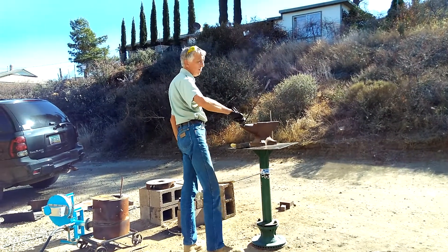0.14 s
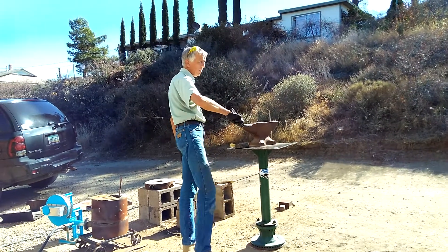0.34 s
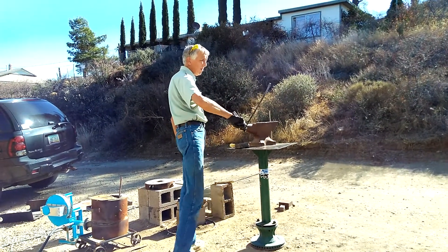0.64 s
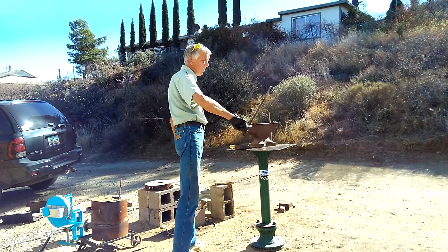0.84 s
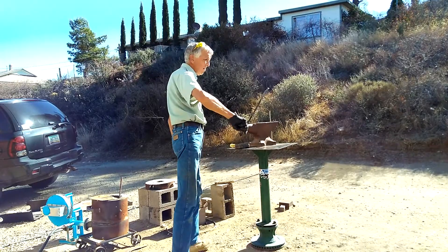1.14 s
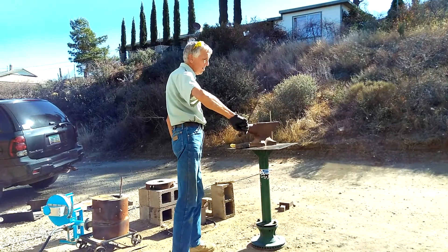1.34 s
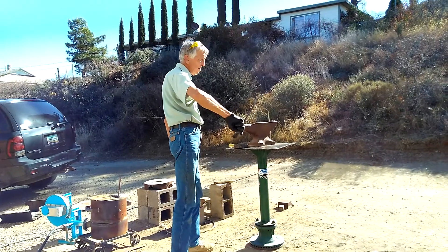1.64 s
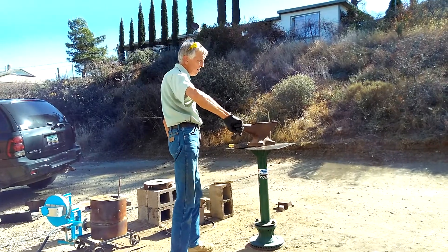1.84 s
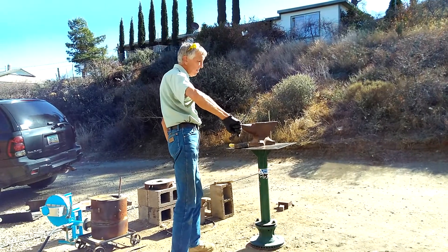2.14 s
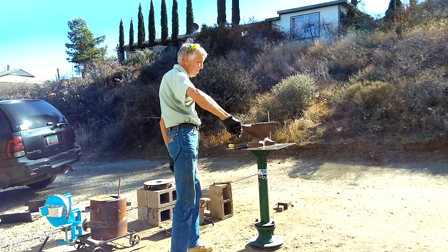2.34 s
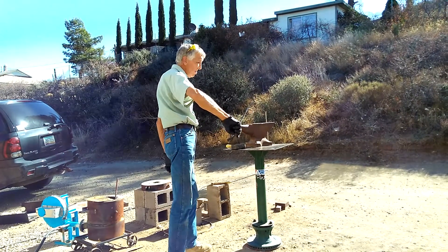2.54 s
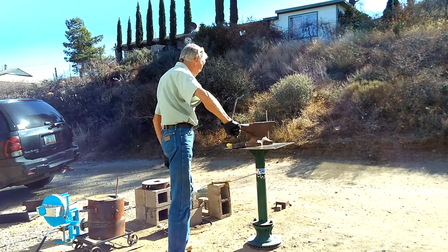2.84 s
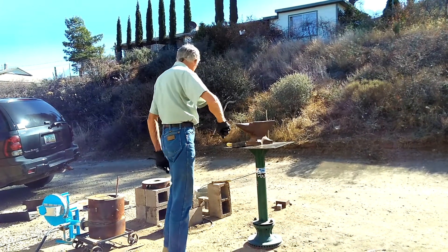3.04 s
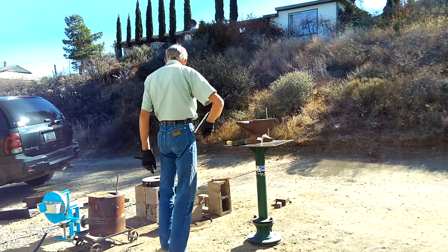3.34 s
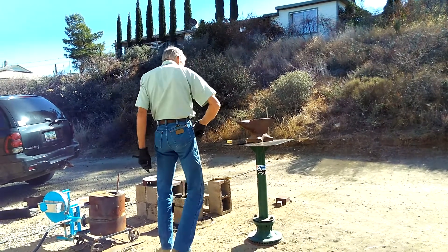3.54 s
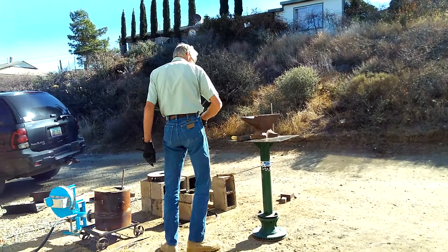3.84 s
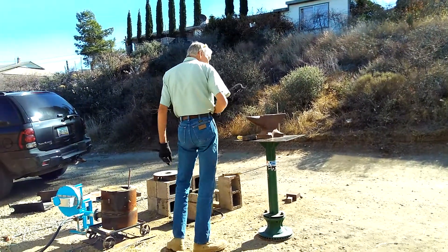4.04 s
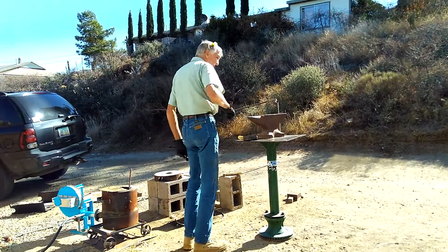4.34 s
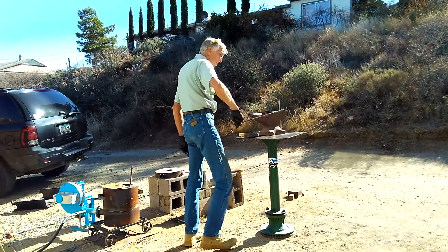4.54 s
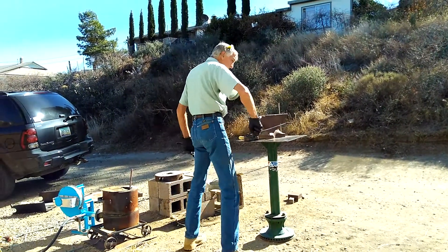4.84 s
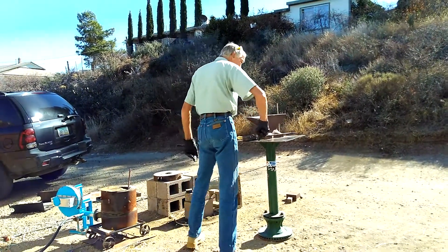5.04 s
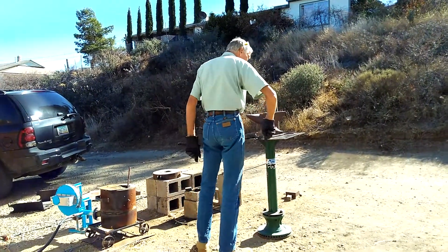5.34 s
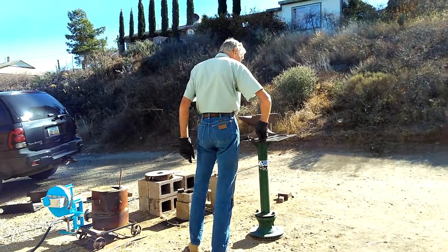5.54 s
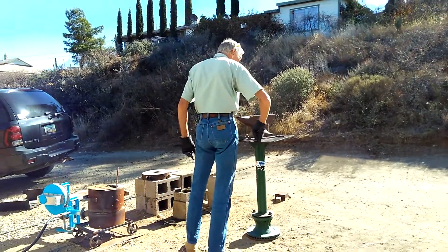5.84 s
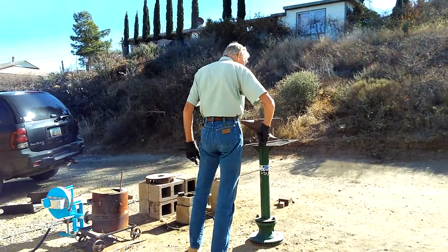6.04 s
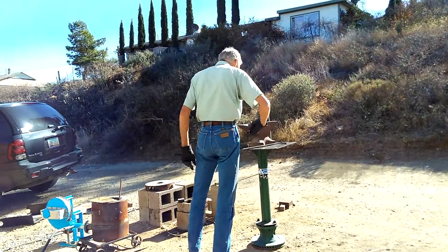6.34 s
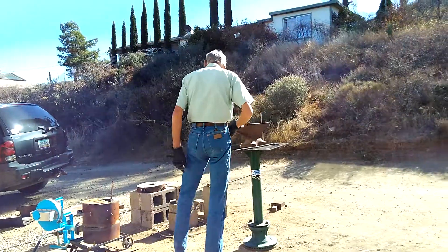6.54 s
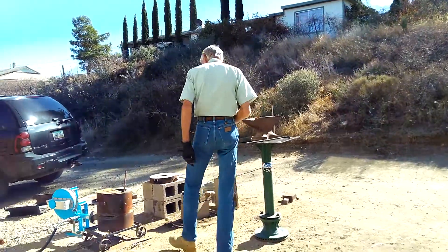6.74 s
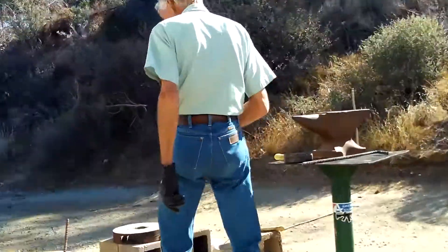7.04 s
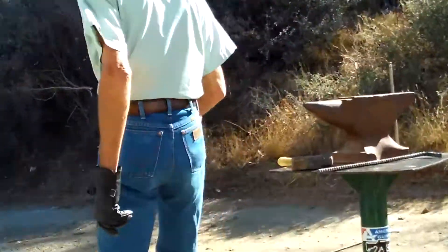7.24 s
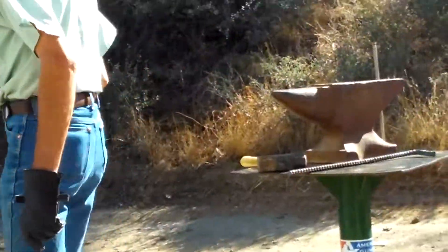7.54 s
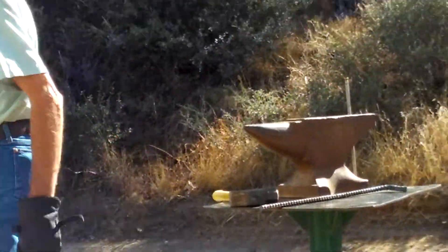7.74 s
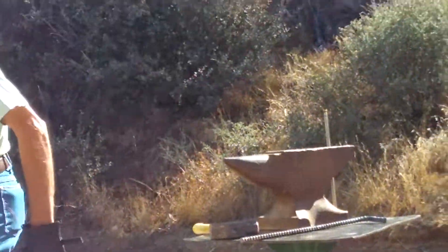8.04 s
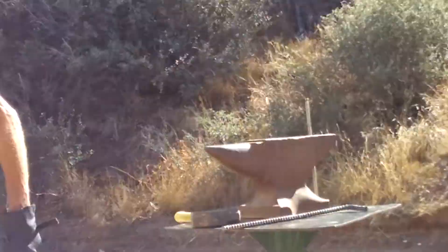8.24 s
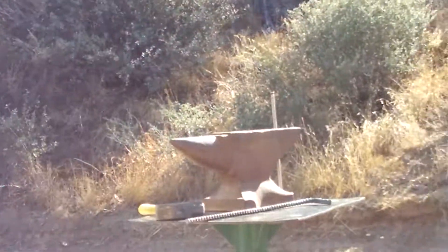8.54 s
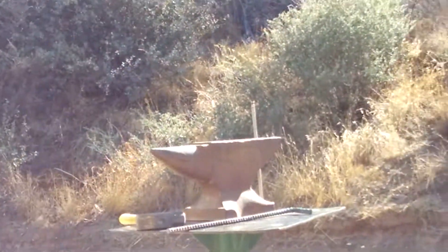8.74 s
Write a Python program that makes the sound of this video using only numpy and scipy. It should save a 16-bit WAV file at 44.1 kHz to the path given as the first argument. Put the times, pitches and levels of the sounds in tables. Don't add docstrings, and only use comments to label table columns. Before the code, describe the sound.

Low steady blower roar outdoors; around five and a half seconds metal tools drop on a ringing anvil plate, then clicks, bumps and gravel crunch.

```python
import sys
import numpy as np
from scipy import signal
from scipy.fft import rfft, irfft
from scipy.io import wavfile
from scipy.ndimage import uniform_filter1d

SR = 44100
rng = np.random.default_rng(int(sys.argv[2]) if len(sys.argv) > 2 else 0)


def level_to_linear(level):
    exponent = np.asarray(level, float) / 20
    return 10 ** exponent


def log_audio(samples):
    frames = np.atleast_2d(samples).T
    limited = np.clip(frames, -1, 1)
    pcm = np.round(limited * 32767).astype(np.int16)
    wavfile.write(sys.argv[1], SR, pcm)


N = 391608


def evened(x):
    return x / np.sqrt(np.mean(x ** 2) + 1e-20)


def read(points, hz):
    f, value = np.transpose(points)
    return np.interp(np.log(hz + 1), np.log(f + 1), value)


def follow(rows):
    rows = np.array(rows)
    return np.interp(np.arange(N) / SR, rows[:, 0], rows[:, 1])


def add(mix, s, sound):
    part = mix[:, round(s * SR):][:, :sound.shape[1]]
    part += sound[:, :part.shape[1]]


def at_ports(pair, db, alike, lag_s):
    hz = np.fft.rfftfreq(pair.shape[1], 1 / SR)
    left, other = rfft(pair) * level_to_linear(db(hz))
    c = np.clip(alike(hz), 0, 1)
    right = c * left * np.exp(-2j * np.pi * hz * lag_s) + np.sqrt(1 - c ** 2) * other
    return evened(irfft(np.array([left, right]), pair.shape[1]))


def patchy(size, patchy_db, shared_db):
    hz, t, z = signal.stft(rng.standard_normal((2, N)), nperseg=size)
    patches = uniform_filter1d(rng.standard_normal(z.shape[1:]), 8, 0)
    patches = uniform_filter1d(patches, 8, 1)
    flicker = uniform_filter1d(rng.standard_normal(len(t)), 3)
    gain = level_to_linear(patchy_db * evened(patches) + shared_db * evened(flicker))
    return signal.istft(z * gain, nperseg=size)[1][:, :N]


# f/Hz, level/dB per Hz
ROAR = [(30, -43), (60, -8.5), (110, 0.5), (250, -2), (420, -9), (560, -19.5), (750, -20.5), (1000, -28.5),
        (1700, -29), (2150, -28.5), (2420, -36), (2900, -49.5), (4500, -51), (7000, -59.5)]
# f/Hz, width/Hz, level above the roar/dB
DUCT = [(129.6, 8, 3.9), (173.1, 4.7, 9.3), (247, 57, 0.82), (318, 117, 5), (375.9, 4.1, 12.4),
        (454.9, 8.7, 13.4), (525.4, 32, 7.9), (840, 12, 6.7), (923.5, 42, 8.4), (1157, 16, 9.7),
        (1324, 39, 5.9), (1488, 118, 10.16), (1692, 97, 11.2), (2048, 20, 7)]
# f/Hz, share
ROAR_ALIKE = [(60, 0.99), (300, 0.97), (700, 0.54), (1500, 1), (2300, 0.54), (3500, 0.13), (6000, 0.089)]
# f/Hz, lag/s
ROAR_LAG = [(100, 0.00016), (500, 0.000009), (1100, 0.00015), (1600, 2.1e-4), (6000, 0.00012)]
# t/s, level/dB
DRAUGHT = [(0.0, -20), (8.88, -19)]


def blower():
    def colour(hz):
        return read(ROAR, hz) + sum(db / (1 + (2 * (hz - f) / w) ** 2) for f, w, db in DUCT)
    air = patchy(size=1024, patchy_db=1.05, shared_db=0.77)
    lag_s = read(ROAR_LAG, np.fft.rfftfreq(N, 1 / SR))
    steady = at_ports(air, colour, lambda hz: read(ROAR_ALIKE, hz), lag_s)
    speed = 1 + .011 * np.interp(np.arange(N), np.linspace(0, N, 30), rng.standard_normal(30))
    place = np.cumsum(speed) * (N - 1) / speed.sum()
    wandering = np.array([np.interp(place, np.arange(N), port) for port in steady])
    return level_to_linear(follow(DRAUGHT)) * wandering


# t/s, level/dB, highest well-driven f/Hz, chatter/s
CLANGS = [
    (5.347, -4.5, 5240, 0.025),
    (5.6504, -18.5, 4300, 0.025),
    (5.8016, -20, 5200, 0.018),
    (5.876, -25.5, 1840, 0.022),
    (5.936, -18.5, 7500, 0.011),
    (5.947, -1.5, 7850, .03),
]
STRUCK = [0, 4, 3, 1, 0, 2]
PLATE = [857, 993, 1096, 1190, 1311, 1494, 1548, 1662, 1724, 1805, 1975, 2046, 2108, 2188, 2498, 2652, 2767,
         2850, 2951, 3070, 3150, 3373, 3403, 3482, 3622, 3708, 4033, 4258, 4332, 4725]
# one row a spot, level/dB
SPOTS = [
    [-20, 0, -11, -15, -9, -8, -16, -15, -2, -11, 5, -9, -11, -1, -11, 0, -4, -4, -18, -5, -10, -11, -22,
     -28, -22, -18, -17, -8, -13, -9],
    [-12, -18, -16, -5, -16, -4, -22, -16, -14, -24, -8, -10, -12, -21, -20, -15, -15, -18, -17, -24, -18,
     -22, -22, -20, -23, -23, -23, -15, -17, -24],
    [-5, -5, -1.5, -1, 0, -8, -3, -9, -3, 2, 0, -0.5, -4, -9, -7, -1, 0, -5, -1, -9, -20, 0, -8, -15, -8,
     -15, -2, -11, -18, -5],
    [-8, -18, -17, 0, -3, -7, -20, -12, -18, -16, -0.5, -17, -13, -16, -18, -18, -14, -13.5, -12, -12, -19,
     -14, -18, -21, -21, -25, -13, -9, -7, -18],
    [-2, -5, -5, -10, -10, -8, 0, -16, -6, -8, -12, -5, -1, -6, -10, -4, 6, -2, -14, -10, -10, -16, -2, -12,
     -5, -16, -14, -12, -3, -16],
]
MODES_DB = [-3.5, 1.5, -2.5, .5, -3]
# f/Hz, level/dB per Hz
SHEET = [(290, -48), (500, -35), (714, -6), (766, -8), (871, -11.5), (935, -10.5), (1170, -0.5), (1630, -4),
         (2020, -1.5), (2500, -1), (3460, -4.5), (4940, -13.5), (6030, -18.5), (15000, -33)]
# f/Hz, t60/s
SHEET_RING = [(600, 0.81), (1200, 0.57), (2500, 0.72), (5000, 0.62), (8000, 0.63), (12000, 0.067)]
DAMPING = [0.67, 0.63, 0.63, 0.62, 0.59]
SPOT_HZ = [700, 1000, 1400, 1900, 2400, 3000, 3600, 4300, 5000]
# one row a spot, level/dB
SPOT_COLOUR = [
    [0.5, 7, 0, 1, -4, 1, 0.11, 4.5, 3],
    [-2, -5, 2, -2, 7, 4, 0, 3, 1],
    [5.5, 0, 2, 0.71, -2, -1, 1, -0.5, 2.5],
    [-5, -6, -1, 1, -2, -1, -1, 3, 2.5],
    [13, 1, 0.7, 0, 4, -5, 0, 0, -3],
]
THUD_DB = [20.6, 12, 20, 8, 13]
CRACK_DB = [-18, -24, -19, -22, -30]
LOWEST_HZ = [500, 795, 448, 800, 420]
# share of the chatter time, level/dB
BOUNCES = [
    [(0, -2), (.12, 0), (.26, -3.5), (.46, -2.5), (.68, -4.5), (.98, -8)],
    [(0, -5), (.37, 2), (.6, -10), (.98, -11)],
    [(0, -6), (.06, -7), (.27, -6), (.39, 0), (.75, -3), (.98, -3)],
    [(0, 0), (.45, -15), (.98, -12)],
    [(0, -6), (.15, -3), (.42, -2), (.98, -7)],
]
# f/Hz, share
CLANG_ALIKE = [(1000, 0.71), (3500, 0.27), (5500, 0.16), (9000, 0.25)]
# f/Hz, lag/s
CLANG_LAG = [(2500, 6e-5), (4000, 1e-5), (9000, 1e-5)]


def clang(overtones, db, top_hz, chatter_s, spot):
    size = SR // 2
    t, hz = np.arange(size) / SR, np.array(PLATE)[:, None]
    damping = DAMPING[spot]
    bounces = np.zeros(4000)
    share, bounce_db = np.transpose(BOUNCES[spot])
    bounces[(chatter_s * SR * np.clip(share, 0, 1)).astype(int)] = level_to_linear(bounce_db)

    mode_db = np.array(SPOTS[spot])[:, None] - 60 * t / (1.15 * damping * read(SHEET_RING, hz))
    shiver_db, shiver_s = 4.5, .018
    knots = np.arange(0, size / SR + shiver_s, shiver_s)[:, None]
    between = np.maximum(1 - abs(t - knots) / shiver_s, 0)
    mode_db = mode_db + shiver_db * rng.standard_normal((len(hz), len(knots))) @ between
    phase, twin_phase, apart = rng.random((3, 2, len(hz), 1))
    twin_hz = hz + 20 * (2 * apart - 1)
    twins = .6 * np.sin(2 * np.pi * (twin_hz * t + twin_phase))
    modes = (level_to_linear(mode_db) * (np.sin(2 * np.pi * (hz * t + phase)) + twins)).sum(1)

    turns = np.exp(2j * np.pi * rng.random((2, len(overtones))))
    lines = irfft(overtones * turns * rng.uniform(0.45, 1, len(overtones)), size)
    grainy = evened(lines) + 1.5 * rng.standard_normal((2, size))
    f, frames, z = signal.stft(grainy, SR, nperseg=256)
    colour_db = read(SHEET, f) + read(np.transpose([SPOT_HZ, SPOT_COLOUR[spot]]), f)
    fade_db = 60 * frames / (read(SHEET_RING, f)[:, None] * damping)
    z = z * level_to_linear(colour_db[:, None] - fade_db)
    dense = signal.istft(z, SR, nperseg=256)[1][:, :size]

    thud = np.sin(2 * np.pi * 1180 * t) * level_to_linear(THUD_DB[spot] - 60 * t / 0.013)
    ring = (evened(dense) + thud) * (1 - np.exp(-t / 0.00092))
    ring = evened(signal.oaconvolve(ring, bounces[None], axes=1)[:, :size])
    modes = modes * (1 - np.exp(-t / (0.17 * chatter_s)))
    ring = ring + level_to_linear(MODES_DB[spot]) * evened(modes)

    def contact(f):
        return -10 * np.log10(1 + (f / top_hz) ** 8 + (LOWEST_HZ[spot] / (f + 1)) ** 4)
    lag_s = read(CLANG_LAG, np.fft.rfftfreq(size, 1 / SR))
    ring = at_ports(ring, contact, lambda f: read(CLANG_ALIKE, f), lag_s)
    crack = uniform_filter1d(rng.standard_normal((2, size)), size=3)
    crack = crack * level_to_linear(CRACK_DB[spot] - 60 * t / 0.16)
    return level_to_linear(db - 5.5) * (ring / np.sqrt(np.mean(ring[:, :900] ** 2)) + crack)


# t/s, level/dB, t60/s, left over right/dB
CLICKS = [(5.5568, -26.5, .034, -1.5), (7.5118, -42, .069, -9), (7.8665, -42, .05, -5),
          (8.7036, -36, .05, -1.5), (7.866, -31, .04, 1.5), (8.6063, -28, .06, -3), (5.6605, -16, .025, -2),
          (4.311, -30, .15, -3), (6.5905, -22, .04, -3), (6.597, -38, .1, -3), (5.8015, -21, .015, 0),
          (7.867, -26, .04, 0), (4.3134, -37, .12, -8), (4.352, -42, .1, -5), (4.392, -44, .1, -5),
          (8.606, -35, .03, -3), (7.866, -42, .04, -5)]
CLICK_KIND = [0, 0, 0, 0, 1, 3, 2, 2, 2, 3, 1, 2, 3, 3, 3, 4, 5]
# centre f/Hz, width/octaves
CLICK_KINDS = [
    (9000, .95),
    (2100, .4),
    (1200, .6),
    (3480, .2),
    (6500, .4),
    (11500, .2),
]


def click(db, t60, lean_db, kind):
    t, (hz, octaves) = np.arange(8192) / SR, CLICK_KINDS[kind]

    def band(f):
        return -6 * (np.log2((f + 20) / hz) / octaves) ** 2
    noise = at_ports(rng.standard_normal((2, len(t))), band, lambda f: .7, 1e-4)
    shape = level_to_linear(-60 * t / max(t60, .004)) + 0.37 * np.exp(-t / 0.00069)
    shape *= 1 - np.exp(-t * hz / 3.2)
    return noise * shape * level_to_linear(db - 1.5 + np.array([[lean_db], [-lean_db]]) / 2)


# t/s, level/dB, ring f/Hz
STONES = [(8.5688, -31, 2000), (8.6063, -26, 3120), (8.6125, -29, 3980), (8.633, -21, 1620),
          (8.651, -26, 3250), (8.6661, -22, 3280), (8.6731, -20, 3950), (8.681, -19, 1800),
          (8.69, -22, 1500), (8.707, -27, 3520), (8.7479, -27, 1900), (8.7599, -31, 3720),
          (8.7748, -27, 3390), (8.784, -25, 3050), (8.8346, -29, 1730)]
# t/s, level/dB, ring f/Hz
TAPS = [
    (5.6543, -17, 1100),
    (5.6603, -9, 1400),
    (5.8022, -14, 1960),
    (5.8025, -17, 4300),
]


def stone(db, hz):
    t = np.arange(8192) / SR
    ring = np.sin(2 * np.pi * hz * t) * level_to_linear(db - 7.5 - 60 * t / .03 + np.array([[-4.0], [3.0]]))
    return click(db + 0.5, .02, -12.0, kind=1) + ring


# start t/s, dig-in/s, lift/s, level/dB
SCUFF = [(8.6, 0.082, 0.12, -25.5)]
# f/Hz, level/dB
SCUFF_COLOUR = [(350, -21), (600, -1), (936, -9), (1150, -5), (1790, -9), (2600, -5.5), (3850, -15),
                (4770, -23), (8520, -39), (15000, -44)]


def scuff():
    knocking = (rng.random(N) < 250 / SR) * level_to_linear(9.0 + 3.0 * rng.exponential(1, N))
    stones = rng.standard_normal((2, N)) * (1 + knocking)
    crunch = at_ports(stones, lambda hz: read(SCUFF_COLOUR, hz), lambda hz: .5, 0.00017)
    rise_db, sag_db, stop_s = 24, 14.5, 0.051
    curve = []
    for s, dig, lift, db in SCUFF:
        end = s + dig + lift
        curve += [(s - .02, -90), (s, db - rise_db), (s + dig, db), (end, db - sag_db), (end + stop_s, -90)]
    return crunch * level_to_linear(follow(curve) + 1.5)


# t/s, level/dB, f/Hz
KNOCKS = [
    (7.6524, -5, 290),
    (7.8685, -17, 480),
    (6.5902, -13, -620),
]


def knock(db, hz):
    t = np.arange(600) / SR
    return level_to_linear(db) * np.sin(2 * np.pi * hz * t) * np.exp(-(t * hz / 0.8) ** 2) * np.ones((2, 1))


# t/s, level/dB, ring f/Hz
BUTTON = (6.5897, -26, 4100)


def button(db, hz):
    t = np.arange(800) / SR
    pitch_hz = hz * (1 + 0.52 * np.exp(-t / 0.0011))
    ring = np.sin(2 * np.pi * np.cumsum(pitch_hz) / SR) * level_to_linear(-60 * t / 0.028)
    spike = np.exp(-t / 0.0005) * (0.78 * rng.standard_normal(len(t)) + 5.5 * np.sin(2 * np.pi * 1500 * t))
    return level_to_linear(db + np.array([[-6.0], [1.5]])) * (ring + spike)


# t/s, level/dB
TICKS = [(0.03, -55), (0.06, -51), (0.16, -49), (0.23, -50), (0.37, -57), (0.47, -51), (0.54, -51),
         (0.81, -56), (0.95, -52), (1.05, -57), (1.29, -47), (1.36, -48), (1.53, -58), (1.7, -50),
         (1.97, -58), (2.04, -55), (2.21, -54), (2.34, -62), (2.51, -52), (2.75, -59), (2.89, -49),
         (3.02, -49), (3.13, -55), (3.19, -55), (3.3, -47), (3.4, -49), (3.5, -56), (3.77, -50),
         (3.91, -57), (4.11, -50), (4.15, -49), (4.25, -56), (4.32, -51), (4.52, -50), (4.69, -61),
         (4.86, -57), (5.0, -58), (5.13, -63), (5.17, -62), (5.24, -53), (5.3, -49), (6.63, -50),
         (6.7, -53), (6.8, -47), (6.94, -46), (7.14, -51), (7.24, -43), (7.48, -45), (7.65, -41),
         (7.72, -46), (7.79, -47), (7.86, -50), (8.1, -45), (8.27, -51), (8.4, -43), (8.84, -42)]


def drive():
    ticks_per_s, first_tick_s = 29.38, .0264
    beats = np.arange(int(N / SR * ticks_per_s) + 1)
    at = np.round((first_tick_s + beats / ticks_per_s) * SR).astype(int)
    train = np.zeros(N)
    train[at[at < N]] = level_to_linear(1.6 * rng.standard_normal(len(at)))[at < N]
    t = np.arange(1600) / SR
    late = t - np.array([[2.5e-5], [0]])
    tick = np.sin(2 * np.pi * 3320 * late) * np.exp(-((late - .0022) / 0.00115) ** 2)
    grain = np.sin(2 * np.pi * 3500 * late) * np.exp(-((late - .0022) / 0.0006) ** 2)
    rattle = level_to_linear(-40) * signal.oaconvolve(train, level_to_linear(-60 * t / 0.043))[:N]
    shaking = (rattle + level_to_linear(-37.5)) * rng.standard_normal(N)
    ticks = signal.oaconvolve(train[None], tick, axes=1)[:, :N]
    ticks = ticks + signal.oaconvolve(shaking[None], grain, axes=1)[:, :N]
    return ticks * level_to_linear(follow(TICKS) + 9.5 + [[-2.0], [1.5]])


# start t/s, stop t/s, level/dB
LENS = [
    (6.64, 7.6, -56),
    (7.72, 7.92, -57.5),
]
# f/Hz, level/dB
LENS_COLOUR = [(4000, -29), (6000, -22), (6600, -2), (8500, -0.5), (9800, -4), (11000, 2.5), (12100, -2),
               (13500, -4), (15500, -3)]


def lens():
    motor = at_ports(rng.standard_normal((2, N)), lambda hz: read(LENS_COLOUR, hz), lambda hz: .7, -0.00013)
    start_s, climb_db, stop_s = 0.078, 3, 0.29
    moving = np.zeros(N)
    for s, stop, db in LENS:
        moving += level_to_linear(follow([(s, -90), (s + start_s, db - climb_db), (stop, db), (stop + stop_s, -85)]))
    return motor * moving * level_to_linear(np.array([[-3.0], [7.0]]))


# middle t/s, level/dB,
# half length/s
RUSTLES = [(0.235, -56.5, 0.061), (.6, -56.5, 0.23), (1.0, -60, 0.13), (1.2, -59, 0.14),
           (1.357, -54.5, 0.075), (1.85, -56.5, 0.19), (2.197, -60, 0.22), (2.534, -55, 0.1),
           (2.69, -59.5, .08), (2.89, -52.5, 0.12), (3.148, -60, 0.22), (3.394, -54.5, 0.15),
           (3.723, -52.5, 0.17), (3.95, -58, 0.24), (4.154, -54.5, 0.083), (4.31, -55, 0.071),
           (4.5, -57.5, 0.14), (4.952, -53.5, 0.042), (5.33, -57, 0.096), (5.44, -47, 0.13),
           (5.645, -49, 0.14), (6.048, -49.5, 0.3), (6.644, -53, 0.17), (7.087, -55, 0.47),
           (7.55, -61, 0.057), (7.91, -57, .07), (8.417, -56, 0.086), (8.545, -51.5, 0.037),
           (8.712, -41, 0.088), (8.88, -51, .03)]
# f/Hz, level/dB
HISS_COLOUR = [(1500, -3), (3000, 6), (4600, -6), (5200, 2), (5700, -8), (6800, -6), (8500, -5.5),
               (10000, -4), (12000, -7), (14500, -10.5), (16000, -20)]


def rustle():
    air = patchy(size=256, patchy_db=2.4, shared_db=0.5)
    rub = at_ports(air, lambda hz: read(HISS_COLOUR, hz), lambda hz: .35, 0.00014)
    t = np.arange(0, N / SR + .01, .002)
    power = level_to_linear(2 * -62.5) + sum(level_to_linear(2 * db) * np.exp(-2 * ((t - s) / half) ** 2) for s, db, half in RUSTLES)
    rubbing = follow(np.transpose([t, np.sqrt(power)]))
    return rub * rubbing * level_to_linear(np.array([[.5], [3.5]]))


def scene():
    mix = blower() + scuff() + drive() + lens() + rustle()
    overtones = rng.random(SR // 4 + 1) < 1 / 8
    for (s, *row), spot in zip(CLANGS, STRUCK):
        add(mix, s, clang(overtones, *row, spot))
    for (s, *row), kind in zip(CLICKS, CLICK_KIND):
        add(mix, s, click(*row, kind))
    for s, *row in STONES + TAPS:
        add(mix, s, stone(*row))
    for s, *row in KNOCKS:
        add(mix, s, knock(*row))
    add(mix, BUTTON[0], button(*BUTTON[1:]))
    return mix


def low_pass(x):
    return signal.sosfilt(signal.butter(12, 16300, fs=SR, output="sos"), x)


# f/Hz, share
CROSS_FEED = [(100, 0.66), (3500, 0.52), (5000, 0.33), (6000, .38), (8500, 0.4), (10500, 0.2), (12500, .15),
              (15000, .2)]


def record(dry):
    hz = np.fft.rfftfreq(N, 1 / SR)
    z = rfft(dry)
    cross_delay_s = 4.05e-4
    wide = irfft(z - read(CROSS_FEED, hz) * np.exp(-2j * np.pi * hz * cross_delay_s) * z[::-1], N)
    power = uniform_filter1d((wide ** 2).mean(0), 1300, origin=600)
    power_db = 10 * np.log10(abs(power) + 1e-12)
    fall = np.arange(N) * 15.9 / SR
    over_db = np.maximum(np.maximum.accumulate(power_db + fall) - fall + 21.0, 0)
    ducked = wide / level_to_linear(0.62 * uniform_filter1d(over_db, 300))
    return low_pass(np.clip(ducked, -.97, .97))


dry = scene()
out = record(dry)
log_audio(out)
```